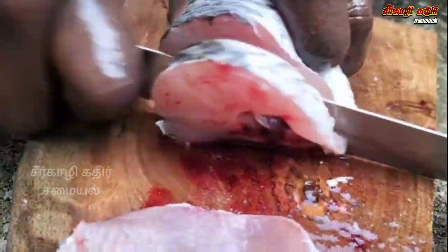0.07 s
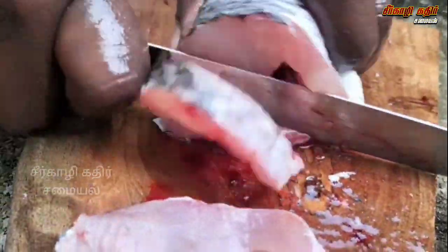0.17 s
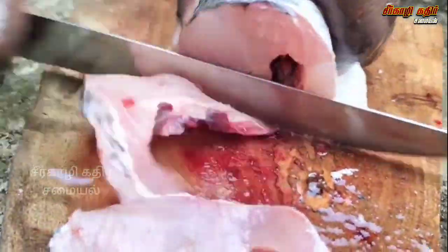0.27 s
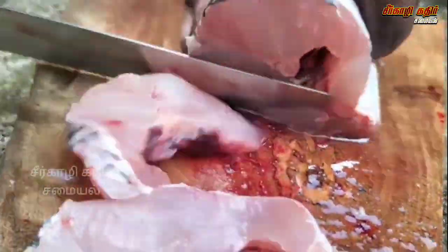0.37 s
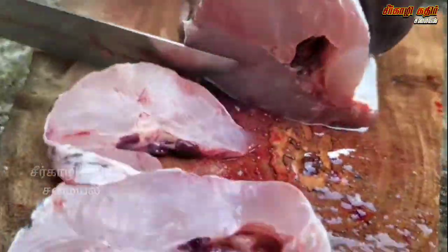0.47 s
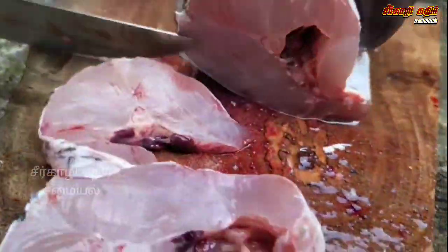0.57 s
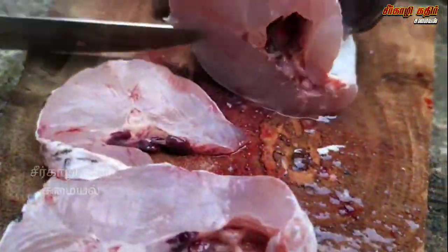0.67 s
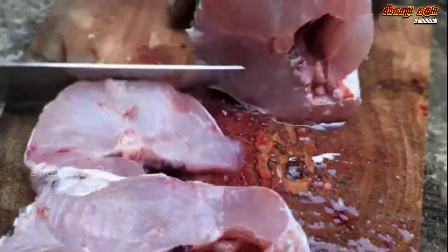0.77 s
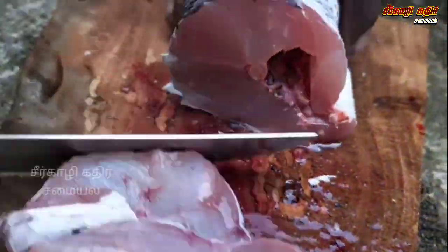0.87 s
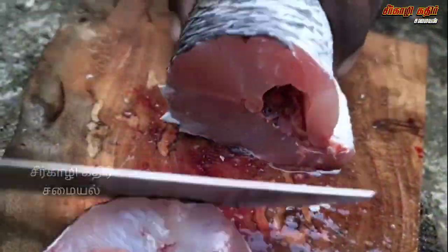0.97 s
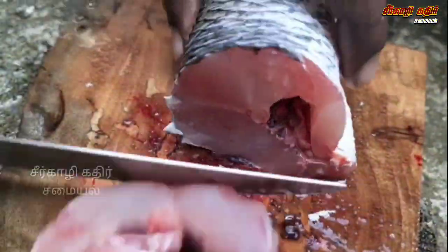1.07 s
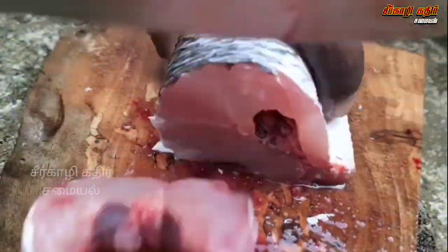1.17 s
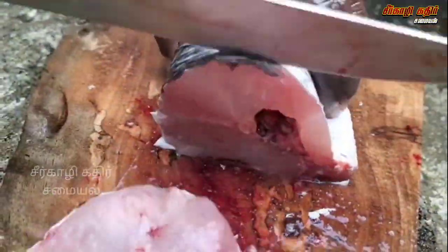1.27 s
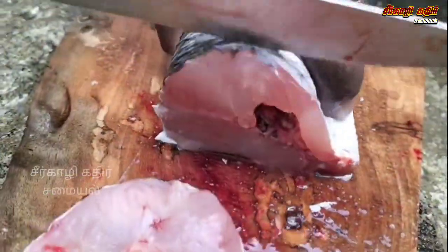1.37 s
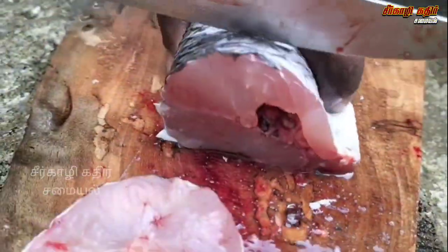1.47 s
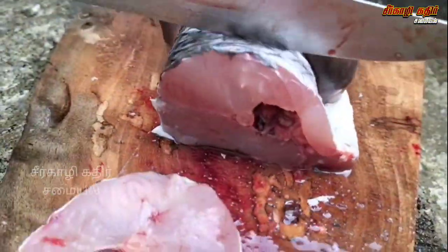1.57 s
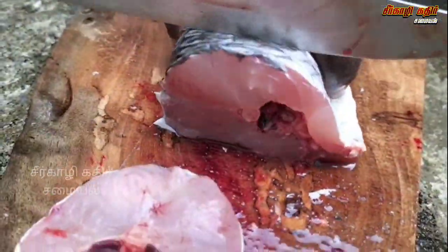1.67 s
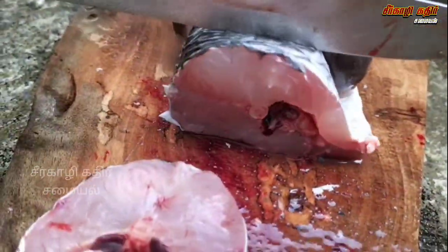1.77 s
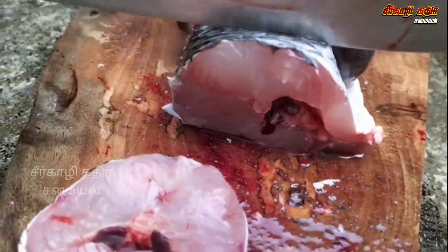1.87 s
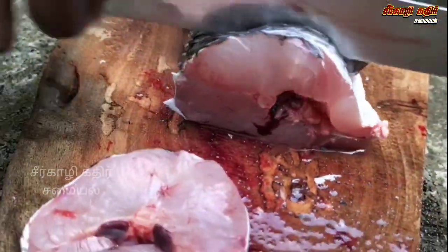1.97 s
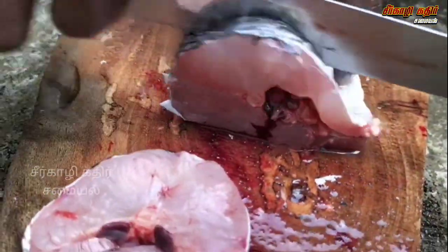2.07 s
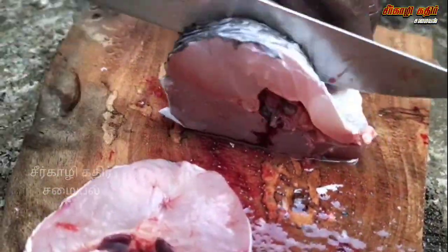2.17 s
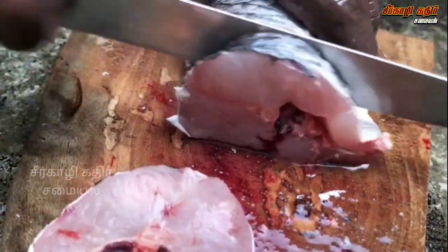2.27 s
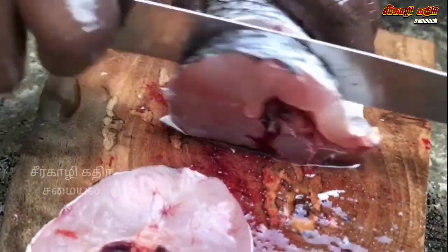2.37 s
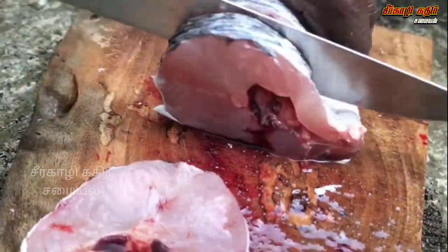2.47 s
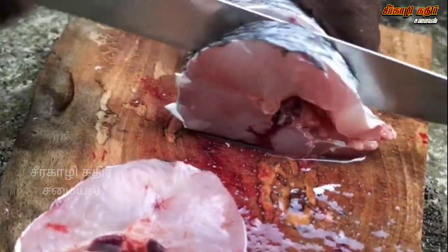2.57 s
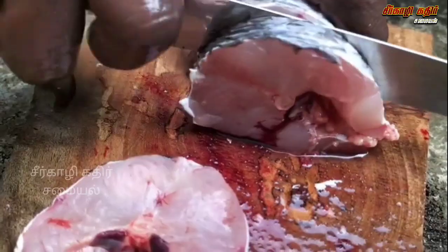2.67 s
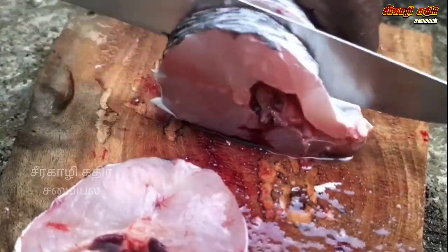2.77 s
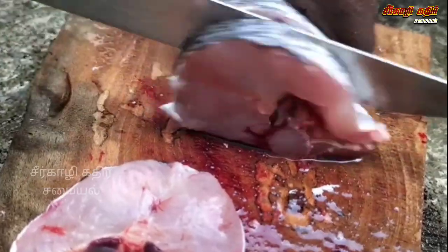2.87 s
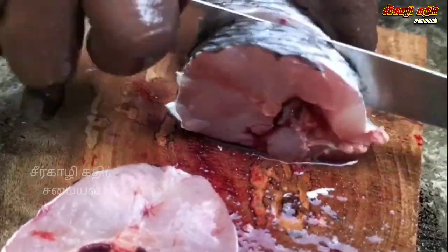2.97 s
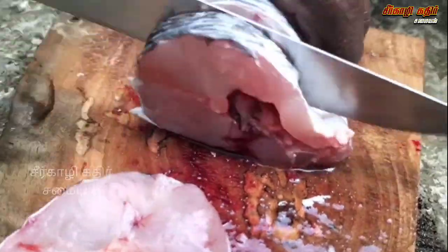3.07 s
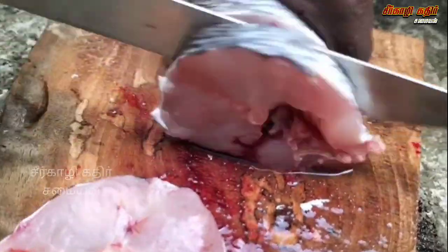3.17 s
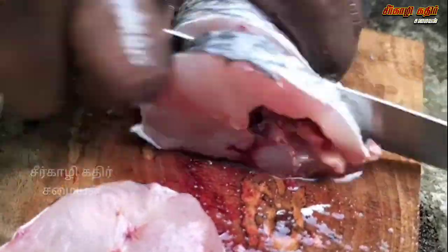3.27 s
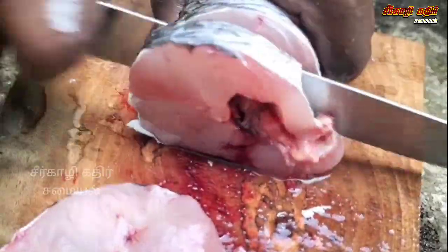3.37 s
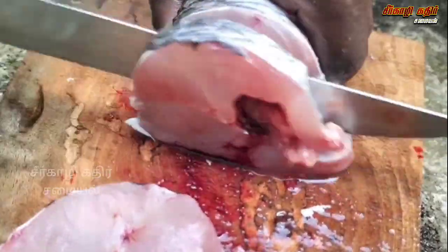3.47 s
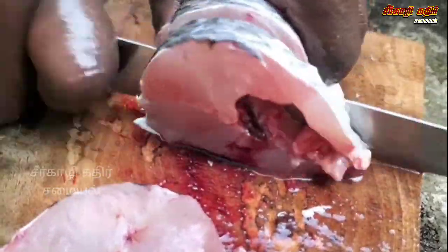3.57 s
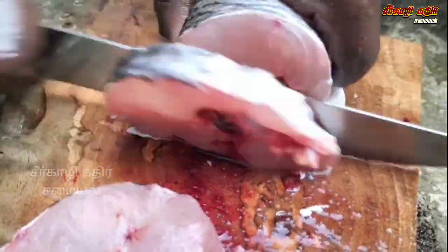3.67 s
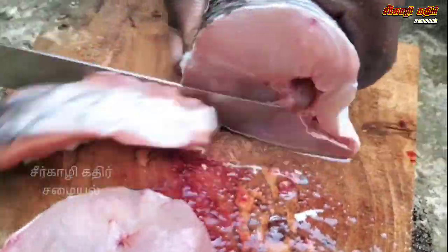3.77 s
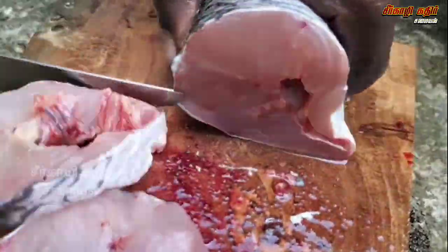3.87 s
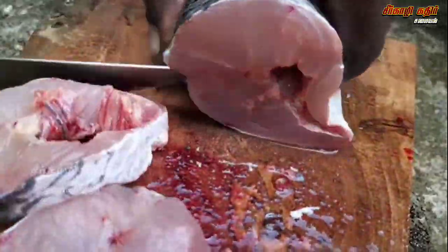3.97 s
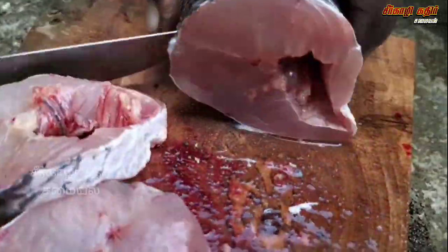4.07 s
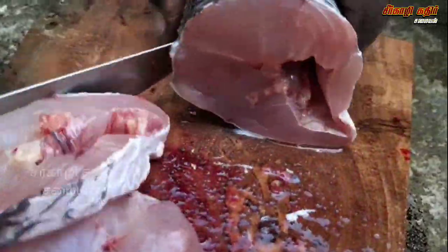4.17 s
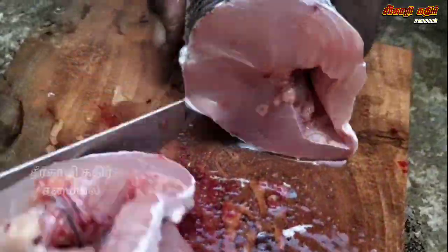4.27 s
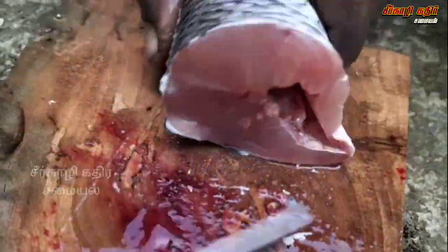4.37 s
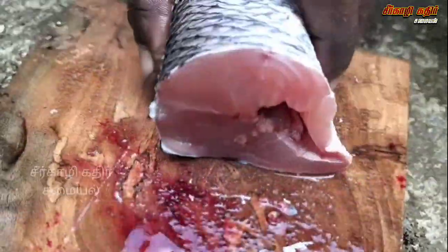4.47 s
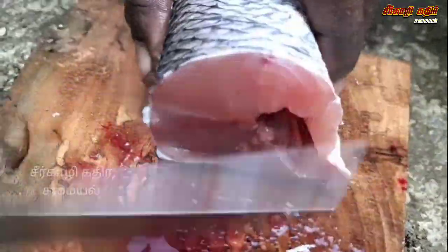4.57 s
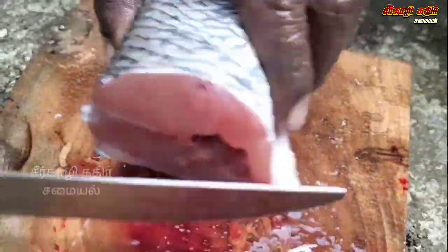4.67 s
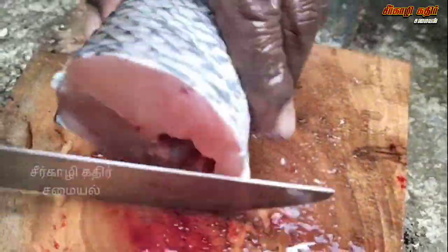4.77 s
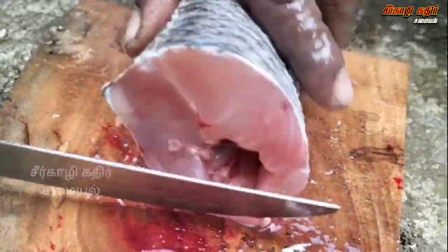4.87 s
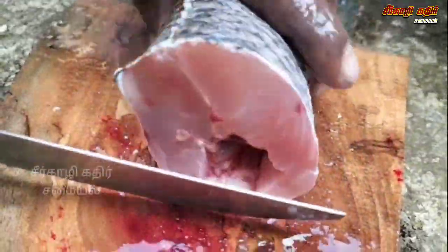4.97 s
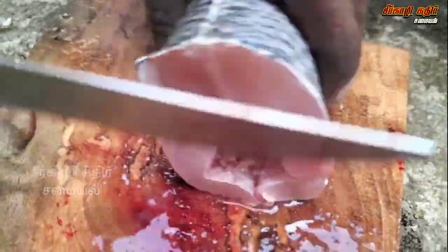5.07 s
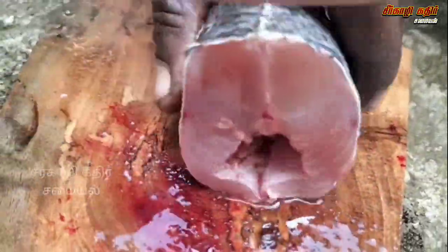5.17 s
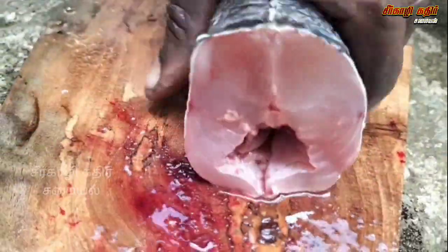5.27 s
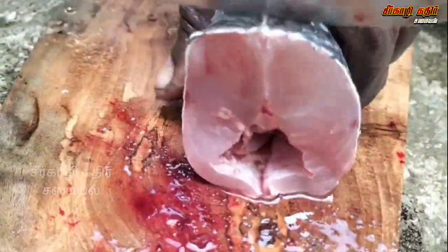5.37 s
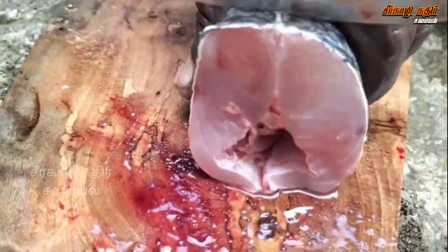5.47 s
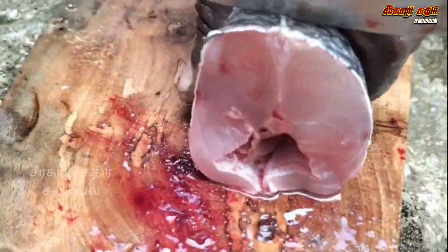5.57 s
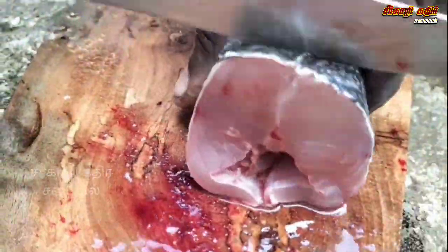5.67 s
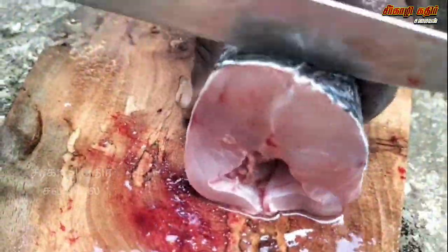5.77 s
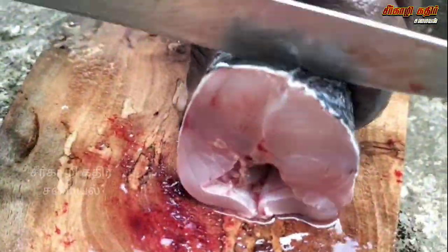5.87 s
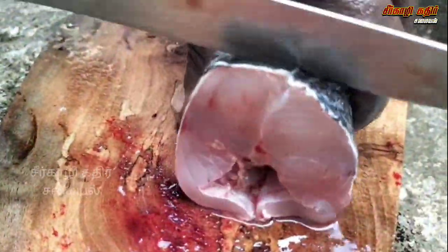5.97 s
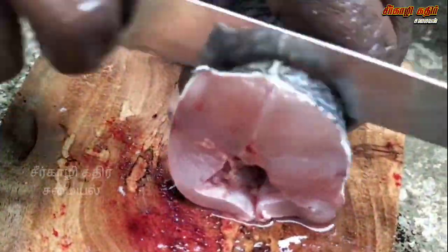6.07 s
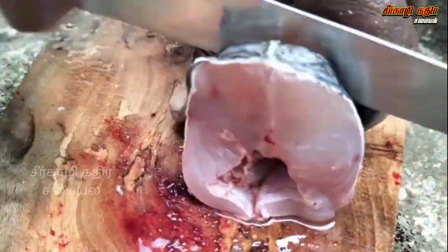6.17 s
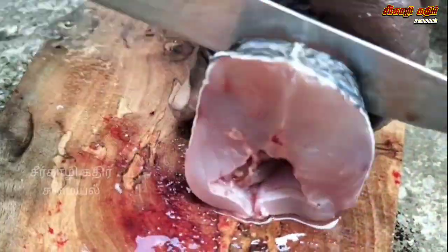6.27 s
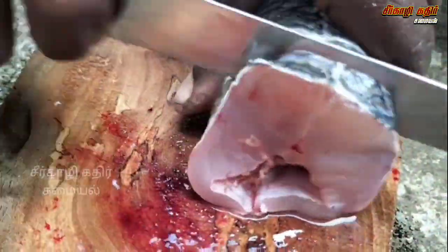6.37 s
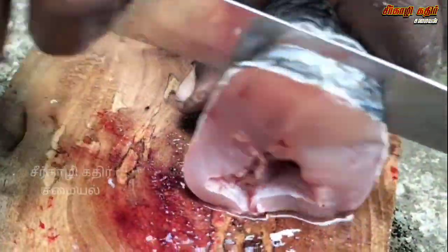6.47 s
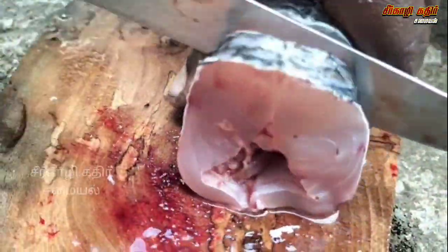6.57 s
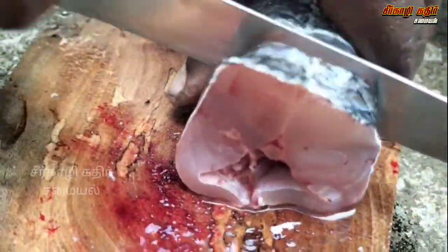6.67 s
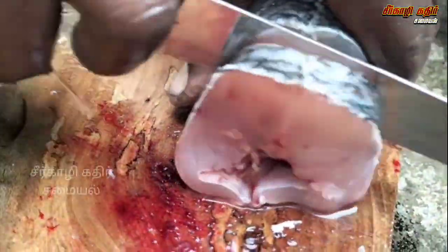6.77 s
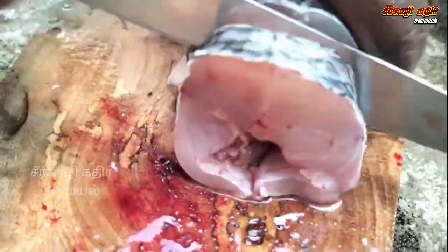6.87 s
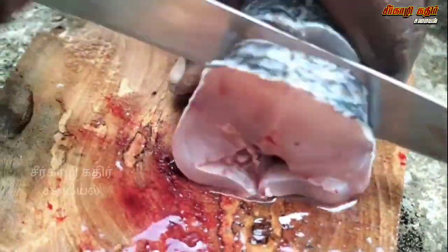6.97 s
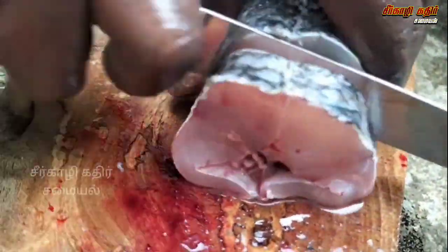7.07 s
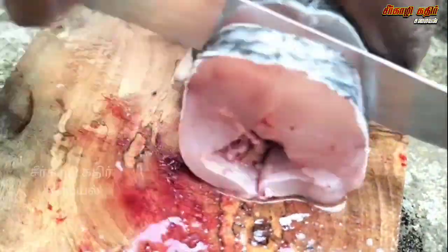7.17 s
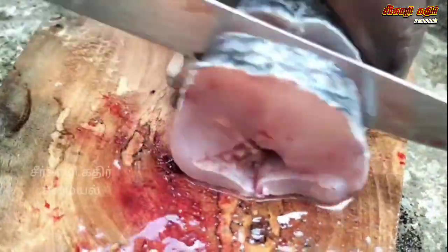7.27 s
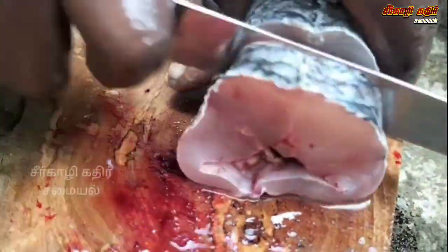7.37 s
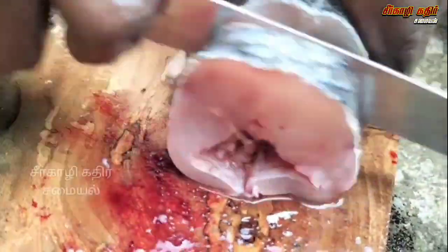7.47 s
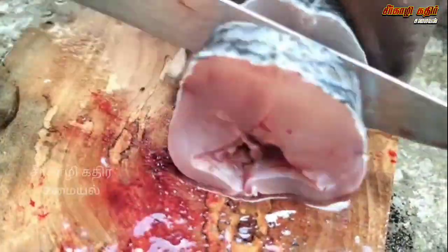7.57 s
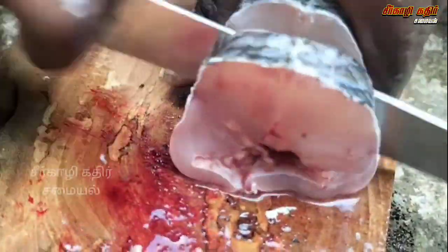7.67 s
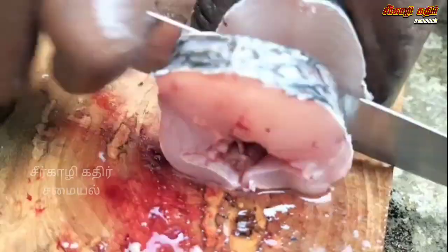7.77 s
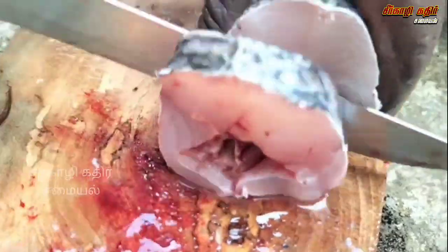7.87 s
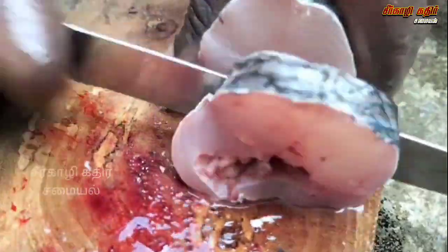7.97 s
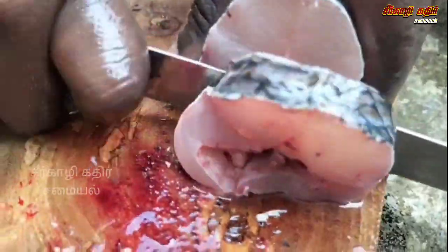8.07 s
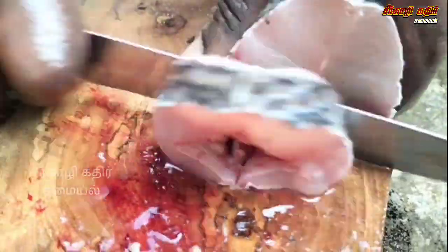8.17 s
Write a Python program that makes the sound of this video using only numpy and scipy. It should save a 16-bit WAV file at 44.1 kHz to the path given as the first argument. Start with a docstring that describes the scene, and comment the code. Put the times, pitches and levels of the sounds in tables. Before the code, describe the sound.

Close wet, raspy fish cutting with crackling bones and a hard blade knock on wood, over faint traffic, leaves and a bird.

```python
"""Far traffic hums and leaves rustle from the start (filtered noise), in an open yard near one small microphone.
At once a knife saws a scaly fish on a wooden board: gritty slips shake blade, flesh, skin and scales; bones
snap as damped rings. A bird whistles upwards at 0.9 s (gliding tones), thin squeaks follow, and an insect
buzzes at 2 s and 3.7 s (pulsed noise). The blade knocks the wood at 0.6 s and hardest at 4.7 s (decaying modes).
Sawing pauses, resumes at 6.1 s, and a far hollow boom throbs at 6.7 s; the last strokes end near 8.2 s."""
import sys
import numpy as np
from scipy import signal
from scipy.fft import rfft, irfft, next_fast_len
from scipy.io import wavfile
from scipy.ndimage import uniform_filter1d

SR = 44100
rng = np.random.default_rng(int(sys.argv[2]) if len(sys.argv) > 2 else 0)


def amplitude_ratio(level_db):
    """Convert a level in decibels to the matching linear amplitude (field) ratio."""
    exponent = np.asarray(level_db, float) / 20
    return 10 ** exponent


def output_pcm(signal):
    """Save a mono or channel-first signal as 16-bit PCM at the path in sys.argv[1].

    Samples are clipped to [-1, 1] before scaling.
    """
    pcm = np.clip(np.atleast_2d(signal).T, -1, 1) * 32767
    wavfile.write(sys.argv[1], SR, np.round(pcm).astype(np.int16))


N = 362042  # samples

# strokes of the edge: (crest [s], swell [s], fade [s], scale fizz [dB], flesh rasp [dB], blade rasp [dB])
STROKES = [(0.022, 0.041, 0.044, -63, -51, -62), (.19, 0.091, 0.073, -60, -45.5, -43),
           (.425, 0.13, 0.14, -69, -39.5, -44), (.51, 0.055, 0.16, -77, -54.5, -54),
           (.62, 0.086, 0.17, -82, -78, -61), (.74, 0.3, 0.34, -105, -57, -60.5),
           (0.893, 0.033, 0.034, -57.5, -46, -48), (0.949, 0.069, .17, -64, -58, -59),
           (2.074, 0.07, 0.11, -59.5, -64.5, -70), (2.225, 0.043, .06, -64, -78, -63.5),
           (2.272, .03, .03, -72, -56, -51.5), (2.391, 0.068, 0.077, -56, -52, -55),
           (2.543, 0.039, 0.089, -56.5, -61.5, -55), (2.71, .042, 0.081, -57.5, -49.5, -57.5),
           (2.87, 0.031, .075, -59, -55.5, -49), (3.024, 0.039, 0.069, -57, -56, -51.5),
           (3.173, 0.027, 0.078, -56, -58.5, -53), (3.338, 0.041, 0.1, -51.5, -54, -51),
           (3.525, 0.12, 0.11, -51, -56, -55), (3.667, 0.052, 0.041, -54, -49.5, -46),
           (3.838, 0.084, 0.14, -47.5, -59, -41.5), (4.232, 0.074, 0.14, -60, -47.5, -55),
           (4.297, 0.071, 0.071, -65, -67, -44.5), (4.375, 0.033, .03, -64.5, -58, -49.5),
           (4.455, 0.037, 0.043, -66, -71, -60), (4.515, .04, .05, -62.5, -63, -53.5),
           (4.925, 0.016, 0.02, -69, -61, -70), (6.063, 0.042, 0.031, -78.5, -79, -85),
           (6.17, 0.06, 0.068, -59.5, -61.5, -62), (6.334, 0.053, 0.081, -64, -77.5, -79.5),
           (6.47, 0.034, 0.081, -70.5, -69.5, -74), (6.515, 0.025, 0.021, -62.5, -57, -55.5),
           (6.66, 0.046, 0.054, -58, -54.5, -73.5), (6.831, 0.071, 0.079, -58, -55, -62),
           (6.992, 0.048, 0.071, -57, -56.5, -68.5), (7.146, 0.046, 0.094, -59, -58, -63),
           (7.303, 0.026, .07, -53.5, -62.5, -65.5), (7.467, 0.045, 0.095, -55.5, -57.5, -62),
           (7.635, 0.032, 0.063, -51.5, -58, -64), (7.812, 0.061, 0.058, -48.5, -48, -49.5),
           (7.942, 0.074, 0.1, -57, -58, -51), (8.123, 0.075, 0.076, -58, -59.5, -53.5)]
# place of the cut: (time [s], board [Hz], flesh [Hz], blade [Hz], firmness of contact [0-1],
# skin swish over blade [dB], board rumble over blade [dB])
PLACE = [(0, 730, 1876, 2414, 0.061, 18, 16.5), (.2, 970, 1664, 2900, 0.012, 5, 2.5),
         (.42, 1250, 1794, 2444, 0.11, 4, 1), (.58, 900, 1740, 2500, 0.17, 0, 3.5),
         (.66, 948, 1865, 2486, 0.69, -1, 8), (.76, 880, 1860, 2480, 1, -16, 11),
         (.86, 910, 1875, 2480, 0.53, 12, 11.5), (.866, 1000, 1299, 4150, 0.65, -1, 5.5),
         (1.07, 730, 1313, 3630, 0.43, -10, -5), (2.1, 605, 1547, 2560, 0.11, 7, -8),
         (2.2, 600, 1573, 2620, 0.57, -23, -22), (3.27, 705, 1665, 2667, 0.55, -15.5, -30),
         (3.35, 656, 1740, 2910, 0.014, 1, -5), (3.67, 590, 1678, 3200, 0.017, -7.5, -9.5),
         (3.8, 865, 1768, 2740, .02, -12, -45), (3.95, 810, 1660, 3870, 0.64, -10, -14),
         (4.23, 760, 1315, 3700, 0.2, -4.5, -4), (4.32, 600, 1268, 3790, 1, -56, -5),
         (4.4, 600, 1183, 3500, 0.96, -27, 1.5), (4.44, 600, 1212, 3000, 0.3, -0.5, 13.5),
         (4.54, 646, 1211, 2873, .4, -3, 3.5), (4.92, 620, 1400, 3005, 0.25, -19.5, 12),
         (6.1, 600, 1655, 3400, 0.019, -4.5, -9), (6.5, 633, 1740, 3740, 0.23, -1, 0.5),
         (6.66, 700, 1550, 3300, 0.79, 4, -5), (6.8, 900, 1246, 2800, 0.14, -5.5, -5),
         (7.2, 640, 1472, 3100, 0.062, 2.5, -2.5), (7.8, 648, 1510, 3460, 0.014, -2.5, -14),
         (7.95, 600, 1650, 3960, 0.11, -7, -5), (8.21, 620, 1492, 4120, 0.087, -7.5, -10.5)]
# spectrum of fizzing scales: (frequency [Hz], density [dB])
SCALES_SPECTRUM = [(3240, -37.5), (5500, -3), (5980, -23.5), (6820, -25), (7480, -3), (8640, 3.5),
                   (9730, 1), (10700, 2.5), (12900, -8), (13900, -19.5), (15000, -25), (15700, -31.5)]
# spectrum of skin swish: (frequency [Hz], density [dB])
SKIN_SPECTRUM = [(590, -38), (1000, -5), (1520, -8.5), (1680, -6.5), (2380, -2.5), (4580, -10),
                 (5840, -3.5), (8500, -12.5), (11000, -69), (18700, -120)]
# bones and scales snapping: (time [s], ring level [dB], ring frequency [Hz], treble crack level [dB])
SNAPS = [(0.129, -51.5, 2855, -43), (0.1639, -22.5, 2340, -43.5), (0.1872, -25, 1180, -52.5),
         (0.1983, -31, 1790, -37), (0.3255, -56, 1810, -61), (0.416, -31.5, 1790, -61),
         (0.471, -37, 1620, -58), (1.1435, -42, 1514, -45.5), (1.245, -80, 1500, -65),
         (2.072, -45, 2570, -38), (2.1041, -48, 1690, -42.5), (2.373, -36, 2620, -46),
         (2.4712, -50.5, 3980, -67), (2.6715, -63, 4100, -45), (2.8206, -58, 1080, -51),
         (2.8482, -40, 2680, -48), (3.136, -75, 1650, -56.5), (3.1595, -47, 3120, -49.5),
         (3.301, -42, 2520, -51), (3.3306, -28, 2660, -35), (3.3387, -34, 3520, -34),
         (3.3737, -28, 3010, -29.5), (3.4074, -41, 1790, -38), (3.6221, -40, 2720, -44),
         (3.6509, -36.5, 1770, -57), (4.1484, -69, 1210, -53), (4.4175, -48.5, 2720, -56),
         (4.4524, -62, 1210, -48.5), (5.6096, -49, 2680, -91.5), (5.9443, -51.5, 2700, -96),
         (6.1404, -51, 4540, -54.5), (6.1663, -49, 1730, -46), (6.5007, -40, 1650, -36.5),
         (6.534, -47, 2800, -54), (6.6, -64, 4070, -54), (6.7535, -58, 1280, -51),
         (6.8232, -32.5, 1430, -36.5), (6.9636, -46.5, 1800, -58.5), (7.1, -47, 2800, -67),
         (7.188, -41, 3880, -44), (7.249, -73, 1250, -59), (7.284, -51, 1800, -54), (7.444, -64, 1450, -45),
         (7.6187, -50, 1740, -39), (7.7942, -40.5, 1750, -34), (7.8078, -34.5, 1780, -61),
         (7.8251, -34, 4040, -37), (7.8825, -49, 3660, -48), (8.1404, -47.5, 1540, -71)]
# blade meeting wood: (time [s], level [dB], sharpness [dB/octave], yard echo over hit [dB])
KNOCKS = [(.5865, -30, -8.5, -9.5), (4.7183, -12, 6.5, -6.5), (4.9079, -29.5, -1.5, -20.5),
          (5.054, -55, -6.5, -13)]
# modes of the board: (frequency [Hz], level before sharpness [dB], t60 [s])
WOOD_MODES = [(600, -5, 0.045), (1259, 2.5, 0.011), (2028, 10.5, 0.0042), (2570, 0.5, 0.0093),
              (3200, 1.5, 0.0076), (3700, -7, 0.013), (3860, -7, 0.0091), (6130, -20, 0.0045),
              (7200, -26.5, 0.0068), (8700, -26, 0.0033), (11000, -33.5, 0.0031)]
# decay of the yard: (frequency [Hz], t60 [s])
YARD_DECAY = [(300, 0.69), (1000, 0.17), (3000, 0.17), (6000, 0.18), (12000, 0.083)]
# thin squeaks: (start [s], length [s], from [Hz], to [Hz], level [dB])
SQUEAKS = [(1.69, .2, 1035, 1070, -74), (6.55, .1, 4090, 4150, -79), (7.35, .11, 3930, 3870, -69),
           (7.66, .12, 1170, 1200, -68)]
# rising bird whistles: (start [s], length [s], level [dB])
WHISTLES = [(.93, .29, -70.5), (2.87, 0.31, -75), (4.35, .36, -75), (6.95, 0.38, -71.5)]
# resonances of the insect: (frequency [Hz], width [Hz], level [dB])
INSECT_PEAKS = [(4010, 240, 0.5), (4470, 220, -6), (4950, 230, 1.5)]
# level of each buzz: (time [s], level [dB])
BUZZES = [
    [(2.13, -73), (2.19, -59.5), (2.87, -64.5)],
    [(3.69, -71), (3.85, -52), (4.22, -91)],
]
# far hollow boom: (start [s], length [s], from [Hz], to [Hz], level [dB])
BOOM = 6.722, .33, 224, 208, -41
# low hums of passing vehicles: (start [s], length [s], from [Hz], to [Hz], level [dB])
HUMS = [(0, .86, 89, 83, -65), (.1, .76, 180, 170, -62), (1.8, .62, 77, 88, -72), (2.36, .2, 149, 150, -62),
        (7.47, .085, 284, 276, -59)]
# level of the traffic in stretches: (time [s], level [dB])
TRAFFIC = [
    [(0.0, -59), (0.476, -62.5), (0.674, -59), (0.86, -61.5)],
    [(0.87, -64.5), (1.28, -65.5), (1.48, -68), (3.75, -64), (4.1, -68), (4.58, -67.5), (5.05, -71.5),
     (5.79, -76), (6.75, -71.5), (6.89, -70.5), (7.26, -72.5), (7.53, -71.5), (7.91, -76.5), (8.2, -75)],
]
# spectrum of the traffic: (frequency [Hz], density [dB])
RUMBLE_SPECTRUM = [(15, -60), (25, -28.5), (141, -2.5), (227, -5.5), (267, -0.5), (382, -12), (554, -17),
                   (600, -18), (780, -48.5), (1320, -120)]
# spectrum of the leaves: (frequency [Hz], density [dB])
LEAVES_SPECTRUM = [(250, -18), (500, 3), (1000, -4), (2000, -8), (3200, -13.5), (3750, -9.5), (4400, -16.5),
                   (6200, -21), (6700, -28), (9000, -28.5), (12000, -30), (13500, -37.5), (16000, -38.5)]
# level of the leaves: (time [s], level [dB])
RUSTLE = [(0, -66), (.86, -60.5), (.9, -66.5), (1.5, -74), (3.5, -67.5), (4.6, -71), (5.3, -77),
          (8.21, -77.5)]


def sawing():
    """The same slips shake board, flesh, blade and skin; scales add a finer fizz."""
    slips = grit(per_s=9000, spread_db=0.7, lumpy_db=2.2)
    fine = grit(per_s=20000, spread_db=1, lumpy_db=1.9)
    board_hz, flesh_hz, blade_hz, firm, skin_db, board_db = (
        spread([PLACE], column=k, rest=0) for k in range(1, 7))
    firm = np.clip(firm, 0, 1)
    board = contact(slips, fine, board_hz, firm, firm_width_hz=180, soft_width_hz=550)
    flesh = contact(slips, fine, flesh_hz, firm, firm_width_hz=413, soft_width_hz=900)
    blade = contact(slips, fine, blade_hz, firm, firm_width_hz=258, soft_width_hz=1660)

    # scales and flesh crest before the blade, whose top is flatter
    fizz_gain = stroke_gain(column=3, lead=0.12)
    flesh_gain = stroke_gain(column=4, lead=0.056)
    blade_gain = stroke_gain(column=5, lead=0, hold=1.414)
    edge = blade + amplitude_ratio(skin_db) * colour(slips, SKIN_SPECTRUM) + amplitude_ratio(board_db) * board
    rasp = blade_gain * edge + flesh_gain * flesh + fizz_gain * colour(fine, SCALES_SPECTRUM)

    # the blade stays in the cut: wet flesh crackles between strokes, single small scales tick
    resting_gain = uniform_filter1d(fizz_gain, size=9000)
    rasp = rasp + amplitude_ratio(-23.5) * resting_gain * colour(grit(3000, 3, 3.2), SCALES_SPECTRUM)
    rasp = rasp + amplitude_ratio(-20) * resting_gain * colour(grit(25, 4, 1.5), SCALES_SPECTRUM)
    rasp = highpass(rasp, order=3, hz=250)  # rubbing moves no bass
    return patchy(rasp, size=512, wide=3, long=30, depth_db=3.5)  # contact along the edge keeps changing


def contact(slips, fine, hz, firm, firm_width_hz, soft_width_hz):
    """Firm contact rings narrowly from the slips; soft contact smears the finer grit."""
    firm_part = np.sqrt(firm) * band(slips, hz, firm_width_hz)
    return firm_part + np.sqrt(1 - firm) * band(fine, hz, soft_width_hz)


def grit(per_s, spread_db, lumpy_db):
    """Tiny slips of the edge: random clicks, a few large, coming in clumps."""
    size = amplitude_ratio(spread_db * np.minimum(rng.exponential(1, N), 5)) * rng.standard_normal(N)
    clumps = uniform_filter1d(uniform_filter1d(rng.standard_normal(N), size=200), size=200)
    return evened(size * (rng.random(N) < per_s / SR) * amplitude_ratio(lumpy_db * evened(clumps)))


def stroke_gain(column, lead, hold=1):
    """Each stroke swells and fades by one rule; short swells give flat tops and steep ends."""
    edge_db, bite_s = -31, 0.12  # edge_db: one swell before and one fade after the crest
    out = np.zeros(N)
    for row in STROKES:
        crest_s, swell_s, fade_s = row[:3]
        power = np.clip(hold * bite_s / swell_s, 1.3, 6)
        lead_s = lead * swell_s
        crest_s, swell_s, fade_s = crest_s - lead_s, swell_s - lead_s, fade_s + lead_s
        first = max(round((crest_s - 2 * swell_s) * SR), 0)
        last = min(round((crest_s + 2 * fade_s) * SR), N)
        at = np.arange(first, last)
        t = at / SR - crest_s
        away = abs(t / np.where(t < 0, swell_s, fade_s))
        out[at] += amplitude_ratio(row[column] + edge_db * away ** power)
    return out


def snaps():
    """A breaking bone or scale: short damped ring with some rattle, and a crack of treble."""
    ring_t60_s, crack_t60_s, onset_s = 0.018, 0.017, 0.0005
    out, t = np.zeros(N), np.arange(2000) / SR
    onset = np.sin(np.pi / 2 * np.minimum(t / onset_s, 1)) ** 2
    for s, ring_db, hz, crack_db in SNAPS:
        rattle, hiss = rng.standard_normal((2, len(t)))
        ring = np.sin(2 * np.pi * hz * t) + 0.45 * band(rattle, 1.09 * hz, 2300)
        ring = amplitude_ratio(ring_db - 60 * t / ring_t60_s) * ring
        crack = amplitude_ratio(crack_db - 60 * t / crack_t60_s) * colour(hiss, SCALES_SPECTRUM)
        add(out, s, onset * (ring + crack))
    return out


def knocks():
    """The board's modes start together and decay, and the yard answers."""
    out, t = np.zeros(N), np.arange(SR // 2) / SR
    onset = np.sin(np.pi / 2 * np.minimum(t / 0.00041, 1)) ** 2  # the contact takes a moment
    for s, db, tilt_db, echo_db in KNOCKS:
        hit = np.zeros(len(t))
        for hz, mode_db, t60_s in WOOD_MODES:
            decay_db = mode_db + tilt_db * np.log2(hz / 2000) - 60 * t / t60_s
            hit += amplitude_ratio(decay_db) * np.sin(2 * np.pi * hz * t)
        hit *= onset
        add(out, s, amplitude_ratio(db) / abs(hit).max() * (hit + amplitude_ratio(echo_db) * yard(hit)))
    return highpass(out, order=4, hz=300)  # a small board moves no bass


def yard(x):
    """Walls of the yard send back a dense tail that dies band by band."""
    t = np.arange(SR // 2) / SR
    noise = rng.standard_normal(len(t)) * np.clip(t / 0.013, 0, 1)
    hz, at_s, z = signal.stft(noise, SR, nperseg=256)
    decay = amplitude_ratio(-60 * at_s / read(YARD_DECAY, hz)[:, None])
    tail = signal.istft(z * decay, SR, nperseg=256)[1]
    return signal.fftconvolve(x, tail / np.linalg.norm(tail))[:len(x)]


def squeaks():
    """Thin gliding tones that swell and sink."""
    out = np.zeros(N)
    for row in SQUEAKS:
        add(out, *tone(*row, arch, width_hz=90, fuzz=1.1))
    return out


def whistles():
    """The bird slides its tone upwards, weakening towards the end."""
    out = np.zeros(N)
    for start_s, length_s, db in WHISTLES:
        add(out, *tone(start_s, length_s, 6590, 7850, db, lambda u: -15 * u ** 3, width_hz=150, fuzz=2.2))
    return out


def insect(per_s, jitter):
    """Uneven wing clicks, each a burst of noise, ring three small resonances."""
    wander = evened(uniform_filter1d(rng.standard_normal(N), size=500))
    turns = np.cumsum(per_s * (1 + jitter * wander)) / SR
    clicks = np.exp(-(turns % 1) / 0.9) * rng.standard_normal(N)
    gain = uniform_filter1d(amplitude_ratio(spread(BUZZES, column=1, rest=-120)), size=600)
    return gain * body(clicks, INSECT_PEAKS)


def boom():
    """A low gliding tone rises fast and throbs as it fades."""
    out = np.zeros(N)
    add(out, *tone(*BOOM, throb, width_hz=50, fuzz=0.55))
    return out


def hums():
    """Passing vehicles: low gliding tones that swell and sink."""
    out = np.zeros(N)
    for row in HUMS:
        add(out, *tone(*row, arch, width_hz=30, fuzz=1.9))
    return out


def air():
    """Far traffic rumbles and leaves rustle: filtered noise in drifting patches."""
    rumble = colour(rng.standard_normal(N), RUMBLE_SPECTRUM)
    rumble = patchy(rumble, size=4096, wide=3, long=8, depth_db=3.5)
    rustle = colour(rng.standard_normal(N), LEAVES_SPECTRUM)
    rustle = patchy(rustle, size=1024, wide=8, long=14, depth_db=3.25)
    traffic_gain = uniform_filter1d(amplitude_ratio(spread(TRAFFIC, column=1, rest=-85)), size=400)
    rustle_gain = amplitude_ratio(spread([RUSTLE], column=1, rest=-88.5))
    return traffic_gain * rumble + rustle_gain * rustle


def tone(start_s, length_s, from_hz, to_hz, db, shape_db, width_hz, fuzz):
    """Start and sound of a gliding sine blurred by narrow noise; shape_db maps progress 0-1 to dB."""
    u = np.arange(0, length_s, 1 / SR) / length_s
    hz = from_hz + (to_hz - from_hz) * u
    blur = band(rng.standard_normal(len(u)), hz, width_hz)
    sine = np.sqrt(2) * np.sin(2 * np.pi * np.cumsum(hz) / SR)
    sound = amplitude_ratio(db + shape_db(u)) * evened(sine + fuzz * blur)
    return start_s, sound * signal.windows.tukey(len(u), 0.1)


def arch(u):
    """Level [dB] that swells and sinks by 16 dB over progress u."""
    return -16 * (2 * u - 1) ** 2


def throb(u):
    """Level [dB] with a quick rise, then a fade that beats."""
    rise, fade_db, throbs, throb_db = 0.075, -38, 4.2, -8  # rise: share of the length
    fade = fade_db * (u + np.exp(-2 * u / rise))
    return fade + throb_db * np.sin(np.pi * throbs * (u - rise)) ** 2


def evened(x):
    """Scales to rms 1."""
    return x / np.sqrt(np.mean(x ** 2) + 1e-20)


def read(points, hz):
    """Reads a table on a log-frequency axis."""
    f, value = np.transpose(points)
    return np.interp(np.log(hz + 1), np.log(f + 1), value)


def colour(x, points):
    """Filters by a spectrum; rms 1."""
    size = next_fast_len(len(x))
    gain = amplitude_ratio(read(points, np.fft.rfftfreq(size, 1 / SR)))
    return evened(irfft(rfft(x, size) * gain, size)[:len(x)])


def highpass(x, order, hz):
    """Butterworth high-pass."""
    return signal.sosfilt(signal.butter(order, hz, "high", fs=SR, output="sos"), x)


def resonate(x, hz, width_hz):
    """Moving resonance: shifts the curve hz to zero, smooths, shifts back."""
    turn = np.exp(2j * np.pi * np.cumsum(hz * np.ones(len(x))) / SR)
    r = np.exp(-np.pi * width_hz / SR)
    return 2 * (turn * signal.lfilter([1 - r], [1, -r], x / turn)).real


def band(x, hz, width_hz):
    """A steep, moving resonance, two in a row; rms 1."""
    return evened(resonate(resonate(x, hz, width_hz), hz, width_hz))


def body(x, peaks):
    """Steep resonances side by side; rms 1."""
    return evened(sum(amplitude_ratio(db) * band(x, hz, width_hz) for hz, width_hz, db in peaks))


def patchy(x, size, wide, long, depth_db):
    """Colour that drifts in random patches: wide in frequency bins, long in frames."""
    z = signal.stft(x, nperseg=size, noverlap=size * 3 // 4)[2]
    patches = uniform_filter1d(rng.standard_normal(z.T.shape), wide, axis=1)
    patches = uniform_filter1d(patches, long, axis=0).T
    return signal.istft(z * amplitude_ratio(depth_db * evened(patches)), nperseg=size, noverlap=size * 3 // 4)[1][:N]


def spread(tables, column, rest):
    """Joins a column of several tables along the whole time; rest fills the pauses."""
    out = np.full(N, float(rest))
    for rows in tables:
        s, value = np.transpose(rows)[[0, column]]
        at = np.arange(round(s[0] * SR), min(round(s[-1] * SR), N))
        out[at] = np.interp(at / SR, s, value)
    return out


def add(mix, s, sound):
    """Mixes a sound in at a time [s]."""
    part = mix[round(s * SR):][:len(sound)]
    part += sound[:len(part)]


def scene():
    """All sources at the one microphone."""
    cutting = sawing() + snaps()
    mix = cutting + amplitude_ratio(-20.5) * yard(cutting) + knocks()
    mix = mix + squeaks() + whistles() + insect(per_s=150, jitter=0.23)
    mix = mix + boom() + hums() + air()
    return mix[None]


def band_limit(x):
    """A steep low-pass at the top of the band."""
    return signal.sosfilt(signal.butter(12, 16020, fs=SR, output="sos"), x)


def record(dry):
    """The finished mix as stored."""
    return band_limit(dry)


dry = scene()
out = record(dry)
output_pcm(out)
```